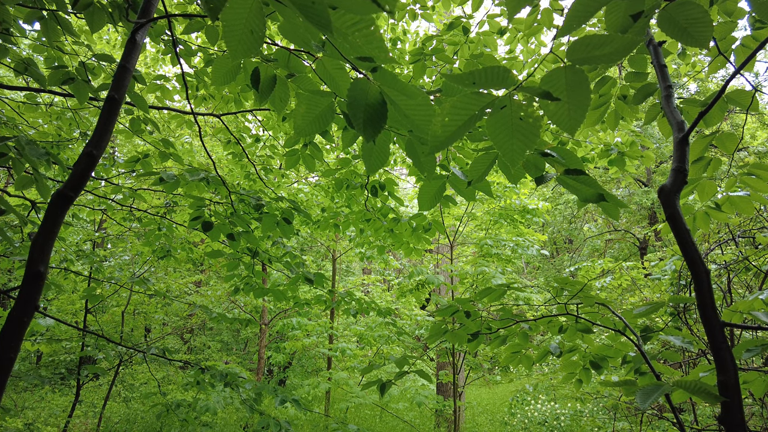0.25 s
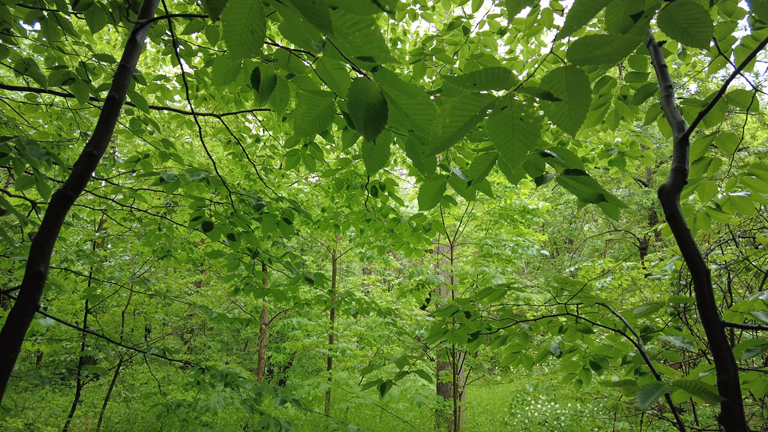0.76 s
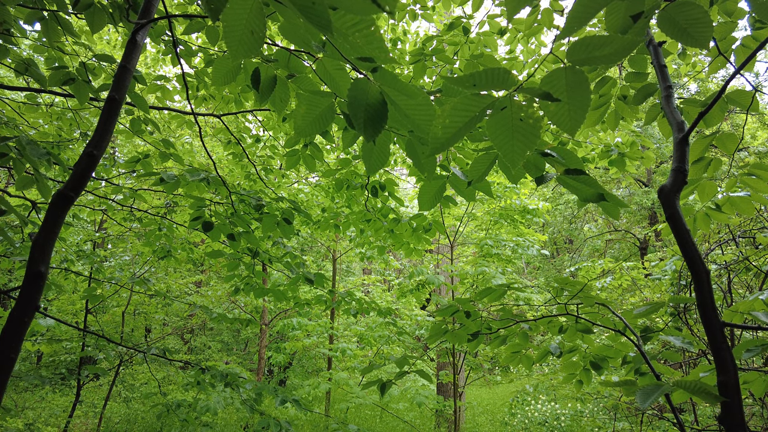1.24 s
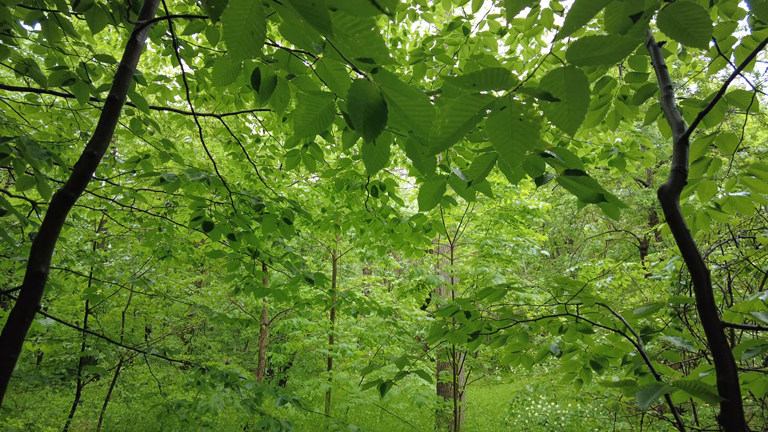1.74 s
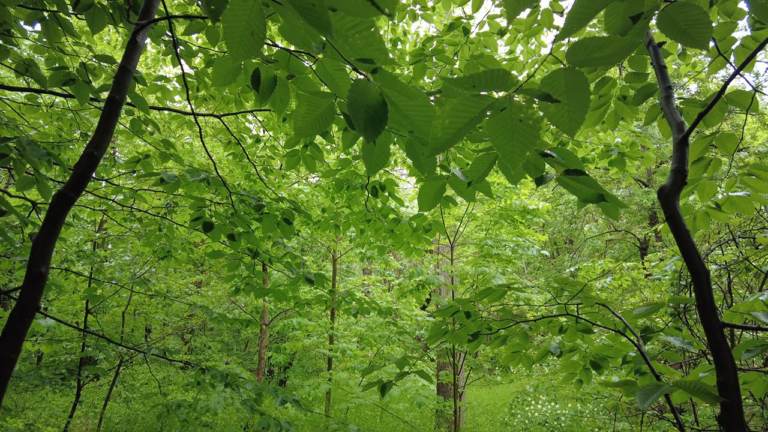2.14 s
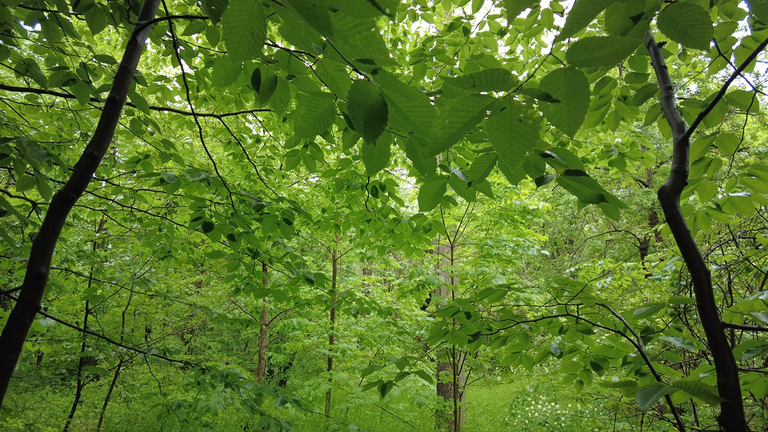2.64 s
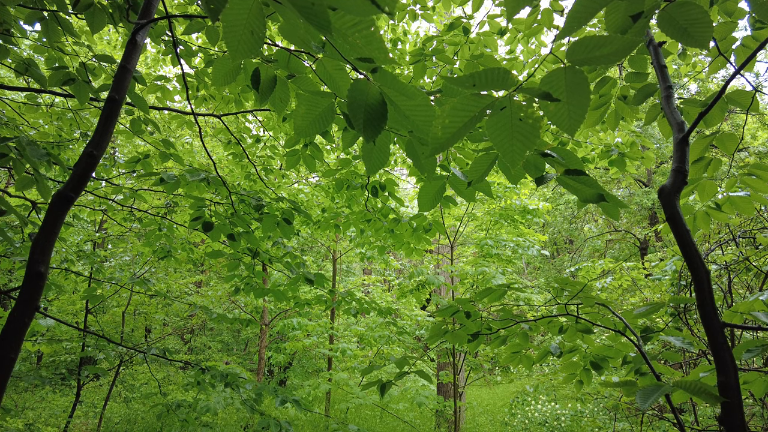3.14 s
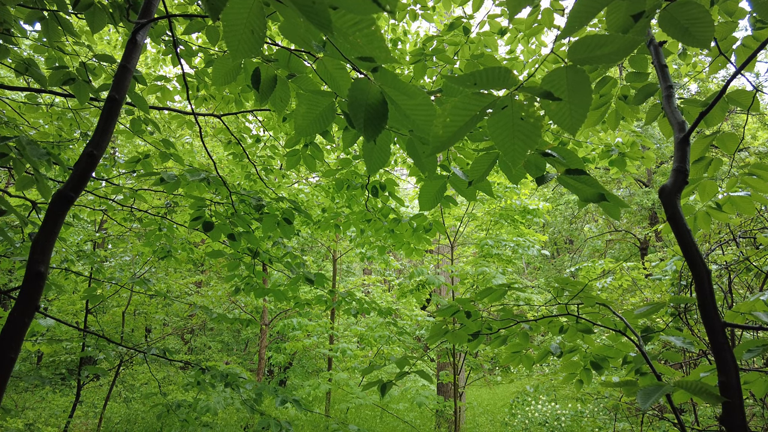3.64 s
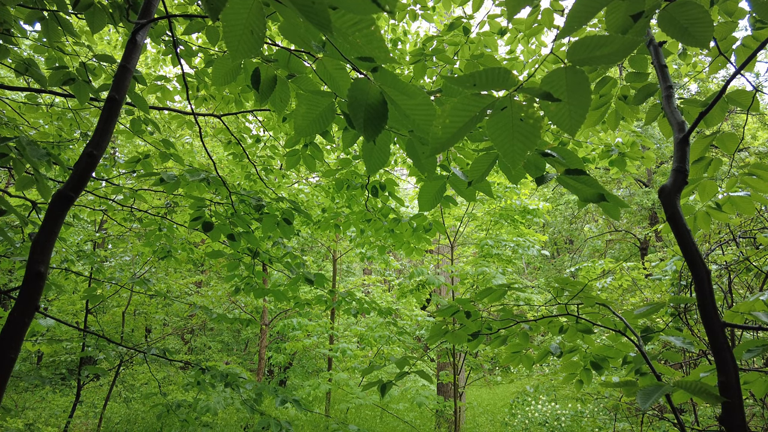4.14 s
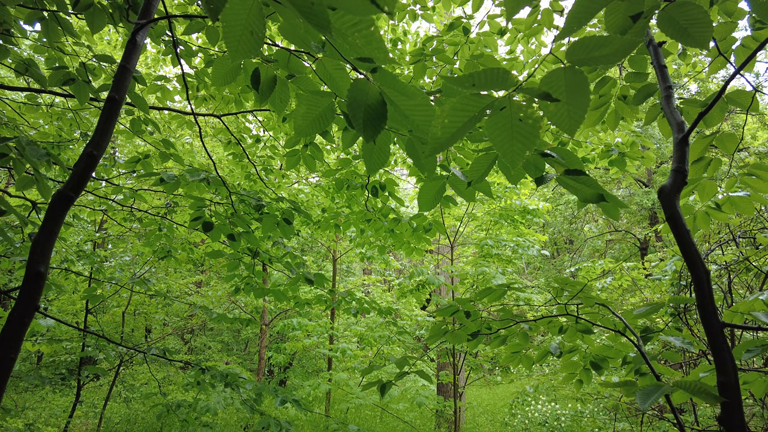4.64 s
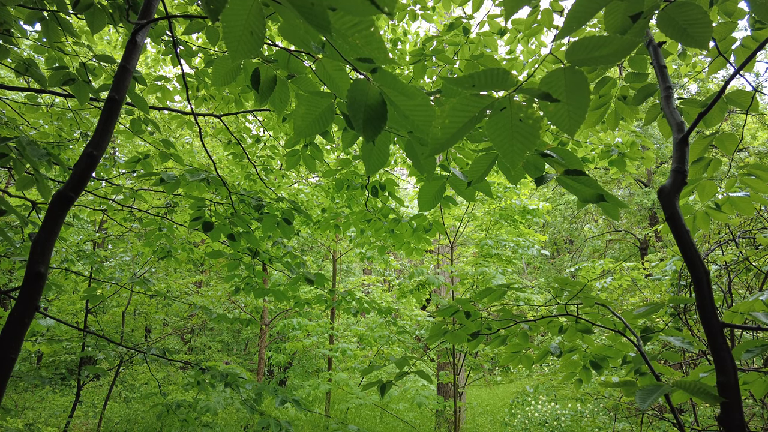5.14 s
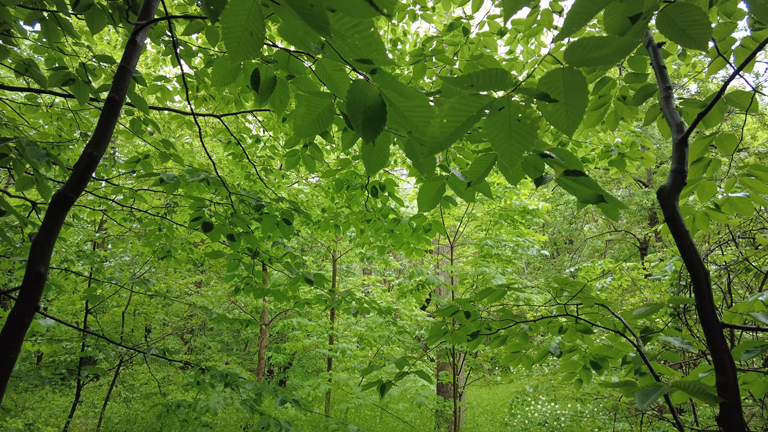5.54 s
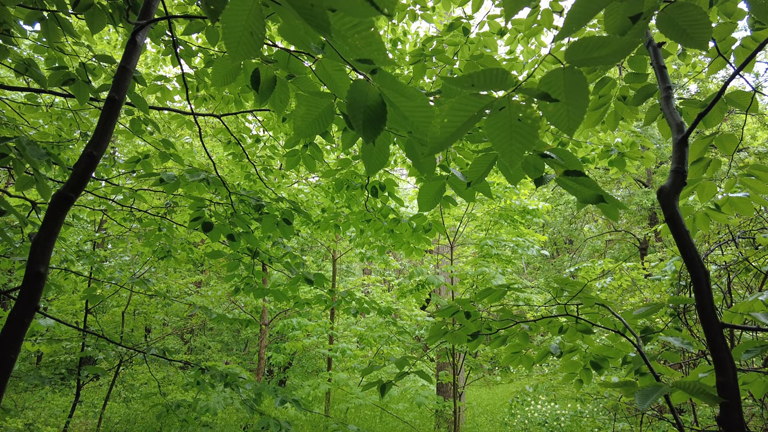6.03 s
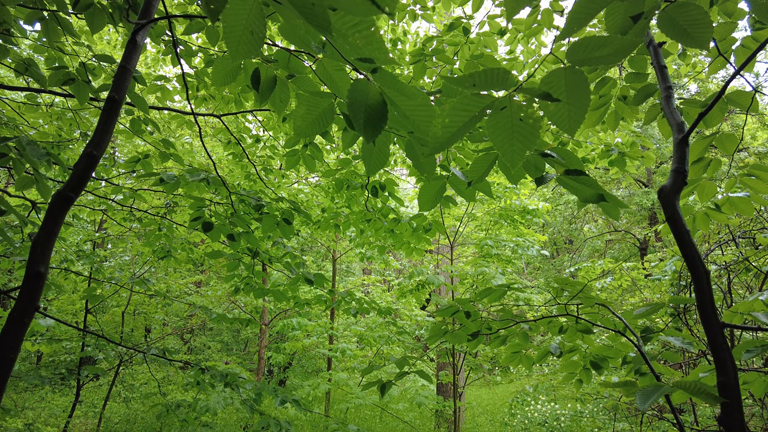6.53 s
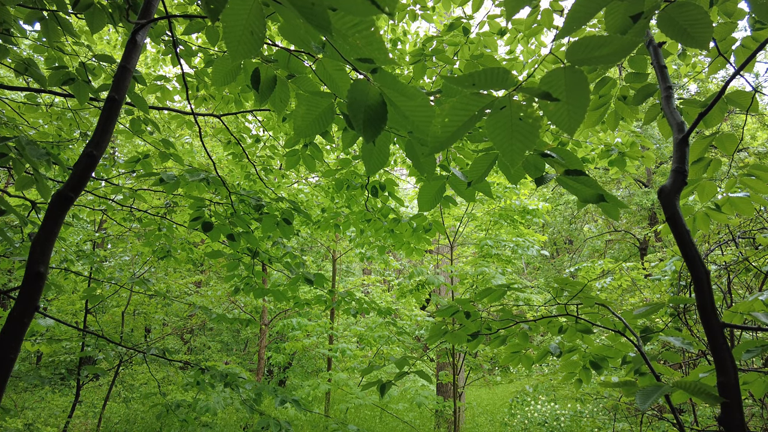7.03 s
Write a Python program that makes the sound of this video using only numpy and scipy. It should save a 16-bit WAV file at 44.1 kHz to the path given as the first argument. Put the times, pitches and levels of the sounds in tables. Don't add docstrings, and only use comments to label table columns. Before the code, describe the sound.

Light rain ticks and pats irregularly on nearby forest leaves over soft hissing patter and a steady low rumble of distant road traffic.

```python
import sys
import numpy as np
from scipy import signal
from scipy.fft import rfft, irfft
from scipy.io import wavfile
from scipy.ndimage import uniform_filter1d

SR = 44100
rng = np.random.default_rng(int(sys.argv[2]) if len(sys.argv) > 2 else 0)


def decibels_to_gain(level_db):
    exponent = np.asarray(level_db, float) / 20
    return 10 ** exponent


def generate_wav(sig):
    pcm = np.round(np.clip(np.atleast_2d(sig).T, -1, 1) * 32767).astype(np.int16)
    wavfile.write(sys.argv[1], SR, pcm)


N = 321048
T = np.arange(N) / SR

# start_s, peak_db, ring_hz, crack_db (re peak), left_minus_right_db
SPLATS = [(0.5072, -42.5, 6300, 2, 5.5), (0.9756, -41.5, 5660, -3, -2.5), (1.1179, -47, 2070, -26, 3.5),
          (1.299, -48.5, 4400, -15, -2.5), (1.67, -38.5, 4300, -10, 5.5), (2.0196, -52, 3700, -8, 0.5),
          (2.667, -45.5, 3223, -25, 6), (2.6712, -44, 5510, -16, 4.5), (3.488, -52, 2800, -17, 3),
          (4.0123, -51.5, 4715, -17, 0.5), (4.145, -46, 4700, -22, -2.5), (5.696, -48.5, 1500, -28, 0),
          (5.8312, -45, 1600, -21, 4)]
# start_s, peak_db, ring_hz, splash_db (re peak), left_minus_right_db
TICKS = [(.3865, -62, 3370, -11, -1), (.6993, -52, 4430, -28, -7), (1.5359, -53, 4600, -8, 7.5),
         (1.5973, -64, 3903, -14, 0), (1.8517, -63, 10000, -6, 0), (1.8896, -58.5, 5950, -3, 4),
         (2.4818, -64, 10930, -6, -4), (2.8544, -53, 4350, -19, -2.5), (2.9183, -66, 1383, -18, 5),
         (3.088, -65, 6300, -23, 0), (3.3052, -56, 5970, -5, 5), (5.071, -49, 6130, -8, 5.5),
         (4.801, -62, 2040, -11, -5), (4.9531, -63, 10840, -20, 3), (5.419, -56, 1156, 0, 7.5),
         (5.5084, -51.5, 3010, -6, -1), (5.5523, -58, 8040, -23, -1.5), (5.6321, -66, 8040, -6, -5),
         (5.9928, -59, 9880, -18, 6), (6.2033, -51.5, 3200, -19, 2), (6.4212, -54, 2306, -9, 4.5),
         (6.788, -57.5, 5076, -1, 5), (5.072, -47, 11500, -22, 5), (6.5234, -54.5, 9000, -8, 1)]
# start_s, peak_db, ring_hz, left_minus_right_db
PATS = [(.0717, -61, 4130, 9), (.1226, -51, 4400, 3.5), (.6509, -53, 2480, 1), (.7721, -56, 2054, -2),
        (1.057, -53, 2990, -3), (1.305, -51, 4300, -1.5), (1.3838, -43.5, 6230, 5), (1.6272, -57, 2990, 1),
        (1.829, -48.5, 1823, 6.5), (2.1585, -46.5, 1366, 4.5), (2.585, -51.5, 2766, 1),
        (2.6319, -53, 5510, -1), (2.7926, -52, 2760, -2), (3.9853, -58, 3457, -4), (4.4473, -55, 2750, .5),
        (4.4842, -60, 1140, 3), (4.8314, -51, 1841, -2), (4.9911, -56, 2900, -1), (5.034, -49, 1630, 4),
        (5.439, -49, 2713, 1.5), (5.6481, -53, 5650, 6), (5.7249, -52, 2990, 5), (6.3744, -61, 3480, 5),
        (6.8583, -44, 1450, -2.5), (6.9905, -56, 4345, 2.5), (1.6892, -49, 1430, -3),
        (1.6935, -54, 2420, -1), (1.795, -56, 3300, 1), (5.585, -54, 1800, 1), (1.736, -58, 1400, 1)]
# start_s, peak_db, ring_hz, left_minus_right_db
PLOPS = [(.9398, -53.5, 3880, -4), (.9547, -54, 3895, 4), (1.3698, -61, 3400, -1),
         (2.3535, -57.5, 4830, 0.5), (2.5471, -50.5, 2994, 9), (3.1732, -61, 2900, 5.5),
         (3.7264, -66, 6030, 2), (4.1101, -53, 2095, -3.5), (4.349, -52, 2983, -4.5),
         (4.561, -60, 7120, -4.5), (5.3313, -51, 1837, -2), (5.9249, -58, 5050, 7), (5.9454, -57, 4100, -1),
         (6.7316, -55, 2060, -1), (.563, -56, 3100, -2), (.748, -59, 2630, 0), (2.559, -60, 4500, 3),
         (2.776, -55, 4100, 1), (1.702, -59, 4400, 4), (3.225, -64, 2600, -2)]
# start_s, peak_db, knock_hz
KNOCKS = [(0.5063, -52.5, 2600), (.9757, -42.5, 2400), (1.3834, -44, 2100), (1.6702, -48, 2000),
          (1.6891, -42, 2000), (1.6882, -37.5, 800), (2.0191, -46.5, 1700), (2.6656, -43.5, 4200),
          (2.6725, -52, 3200), (4.146, -55, 2300), (5.0712, -48.5, 1698), (5.438, -47.5, 2000),
          (5.696, -51, 1500), (6.859, -53, 2100)]
# start_s, peak_db, centre_hz, crack_db (re peak), left_minus_right_db
SLAPS = [(1.1179, -53, 1700, -30, 0), (1.1179, -61, 6200, -20, 0), (1.3694, -52, 2600, -30, -1),
         (1.3842, -45, 3500, -25, 6.5), (1.6885, -51, 3850, -34, 1.5), (1.829, -59, 7000, -4, 4),
         (2.6667, -51, 1600, -30, 1.5), (3.489, -59, 6300, -20, 1), (4.8, -51, 2201, -30, -2),
         (4.8, -56, 9500, -30, -2), (4.9908, -51, 2200, -30, -1), (5.0336, -54, 6200, -8, 1.5),
         (5.0336, -54, 2800, -25, 2), (5.3304, -57, 2900, -25, -1), (5.4085, -59, 4000, -12, 2),
         (5.6222, -59, 2800, -30, 1.5), (5.7075, -52, 1900, -28, 0), (5.757, -57, 1600, -30, 2),
         (5.8315, -53, 6500, -16, 2.5), (6.5234, -61, 4000, -14, 2), (6.858, -51, 2500, -30, -2),
         (6.874, -58, 1595, -30, 1), (1.671, -46, 6800, -8, 4.5)]
# start_s, peak_db, ring_hz, left_minus_right_db
PINGS = [(.1226, -58, 4400, 3), (1.299, -57, 4300, -2.5), (1.307, -57, 4350, -3.5), (1.537, -64, 4400, 7),
         (.509, -54, 6100, 4), (4.4474, -59, 2800, 0), (5.648, -58, 5600, 5.5), (5.696, -53, 2800, -1),
         (6.4225, -64, 4600, 3), (6.7325, -59, 3300, -1), (6.858, -52, 2610, -2.5), (6.99, -59, 4350, 3.5),
         (1.6885, -47, 3200, 0), (1.692, -51, 800, 2), (5.692, -55, 850, 0), (5.295, -53, 900, 2),
         (.5068, -54, 6200, 5), (1.6705, -49, 4700, 4), (1.675, -54, 3600, 3), (1.6705, -53, 1700, 2),
         (2.672, -54, 4400, 5), (2.682, -58, 5400, 3), (2.694, -59, 3600, 4), (4.9908, -58, 2700, -2),
         (5.0336, -57, 1800, 2), (5.438, -56, 3200, 1), (5.44, -55, 1650, 0), (5.5095, -55, 1400, -1),
         (5.331, -60, 2200, -1), (6.859, -57, 3000, -2), (1.697, -56, 3000, 1)]
# start_s, peak_db, ring_hz, left_minus_right_db
THUDS = [(0.106, -53, 794, 2.5), (1.015, -54, 834, -1), (1.807, -52, 818, 3.5), (2.326, -52, 810, 0),
         (4.614, -50, 718, 1.5), (4.8, -52, 910, 4), (5.17, -49, 823, 4), (5.896, -51, 781, 1),
         (6.521, -54, 506, 1.0), (7.035, -55, 851, 4)]

# time_s, gain_db
SHOWER = [(0, 3), (.6, 0.5), (1, 1.5), (2.3, 0), (2.7, 1.5), (3.9, 0), (4.2, 0.5), (4.5, 0), (5.5, 1.5),
          (7.28, 0.5)]
# centre_s, half_length_s, gain_db
FLURRIES = [(.14, 0.046, 1), (.96, .05, 2), (1.73, 0.065, 1.5), (2.68, 0.059, 2.5), (3.18, 0.07, 2),
            (3.32, .05, 1.5), (3.51, .05, 2), (4.2, .07, 3), (4.93, .05, 3.5), (5.44, 0.057, 4.5),
            (5.53, 0.034, 3.5), (5.86, .05, 0.5), (5.96, 0.046, 2), (6.82, 0.041, 3.5)]
# frequency_hz, density_db (per Hz)
HISS_SPECTRUM = [(1060, -25), (1800, -8.5), (2330, 0), (4370, -6.5), (7770, -12.5), (10100, -17),
                 (12200, -18), (12800, -18.5), (13300, -48), (16000, -35)]
# frequency_hz, density_db (per Hz)
MIST_SPECTRUM = [(14200, -14), (15000, -5), (15600, 0), (15900, 0)]

# time_s, gain_db
TRAFFIC = [(0, -0.5), (1.6, 1), (2.7, -1), (4, 0), (5.4, -1), (6.2, 1), (7.28, 0)]
# frequency_hz, density_db (per Hz)
RUMBLE_SPECTRUM = [(8.8, -39.5), (15, -3), (43, 2), (70, -0.5), (98, -3.5), (172, -20), (200, -27.5),
                   (260, -25.5), (440, -120)]
# frequency_hz, density_db (per Hz)
ROAR_SPECTRUM = [(100, -37), (170, -4), (297, 2.5), (475, -10.5), (804, -11.5), (1030, -19.5), (1140, -22),
                 (1290, -16.5), (2200, -30.5), (2860, -69), (4840, -120)]
# frequency_hz, density_db (per Hz)
TREAD_SPECTRUM = [(690, -17), (770, 6), (860, 3), (960, -11.5)]
# frequency_hz, left_minus_right_db
PORT_LEAN = [(60, -1.5), (110, 0.5), (200, 1), (380, 0), (700, 2.5), (1290, 1), (2380, 0.0), (4400, 1),
             (8120, -1), (15000, 1.5)]
# frequency_hz, likeness_0_to_1, right_lag_rad
PORT_COHERENCE = [(60, .99, 0), (170, .98, .1), (260, .89, .2), (430, .78, .2), (600, .46, 1.2),
                  (860, .28, 1.2), (1030, .28, 2.6), (1150, .15, 2.9), (1190, .2, .1), (1330, .75, .1),
                  (1720, .39, .1), (2330, .33, 0), (3300, .1, 0), (3600, .1, 2.5), (4700, .22, 2.7),
                  (15000, .1, 2.4)]

# time_s, pitch_hz, level_db
LORRY = [(0, 90.64, -47.5), (3, 73.87, -54)]
# time_s, pitch_hz, level_db
CAR = [(3.4, 128, -60), (3.65, 125, -55), (4.3, 105, -53.5), (4.9, 90, -50), (5.9, 76, -49)]
# time_s, pitch_hz, level_db
VAN = [(2.6, 54.63, -53), (3.2, 59.76, -45.5), (3.9, 62.7, -53)]
# time_s, pitch_hz, level_db
IDLER = [(0, 32.3, -41.5), (.6, 33.87, -53), (1.3, 37.06, -44.5), (2.5, 36.38, -45), (3, 35.87, -53),
         (5.4, 37, -55), (5.9, 36.9, -43), (6.2, 36.5, -53), (6.6, 37.2, -45), (7.28, 37, -45.5)]
# time_s, pitch_hz, level_db
WHINE = [(6.1, 150.2, -63), (7.28, 150.5, -62)]
# time_s, pitch_hz, level_db
OVERTONES = [
    [(.8, 172.6, -65.5), (1.75, 160.5, -60)],
    [(1.2, 1230, -81), (2.2, 1225, -76)],
    [(4.7, 312, -68.5), (5.7, 309.5, -61), (6.05, 304.4, -64)],
]
# centre_s, half_length_s, gain_db
AIR_SWELLS = [(0.123, 0.073, 13), (0.309, 0.054, 11.5), (0.482, 0.05, 8.5), (.85, 0.2, 11.5),
              (1.154, 0.057, 11), (1.615, 0.067, 4.5), (1.883, 0.11, 12), (2.342, 0.13, 12),
              (2.678, 0.046, 14), (4.334, 0.11, 6), (4.533, 0.065, 3), (5.392, 0.14, 7), (5.65, 0.051, 8)]

# start_s, length_s, start_hz, end_hz, trembles_per_s, level_db
BIRD_NOTES = [
    (2.45, .11, 7150, 7100, 2200, -81),
    (4.54, .19, 7000, 7150, 2600, -81),
    (4.06, .07, 7600, 7500, 900, -83),
    (3.09, .08, 2500, 3300, 400, -79),
    (3.23, .075, 2450, 2300, 40, -74),
    (3.385, .065, 2400, 2950, 40, -75),
    (6.528, .04, 2750, 2720, 40, -72),
]


def resonance(hz, centre_hz, sharpness):
    s = 1j * hz / centre_hz
    return s / sharpness / (1 + s / sharpness + s * s)


def add(out, times, bursts):
    for t, burst in zip(times, bursts):
        i = int(t * SR)
        out[:, i:i + burst.shape[1]] += burst[:, :max(N - i, 0)]


def drops(times, db, ring_hz, crack_db, splash_db, pan_db, ringing=1.0, sharpness=0.88, step=1.98, size=3072):
    t, hz = np.arange(size) / SR, np.fft.rfftfreq(size, 1 / SR)
    chance = rng.standard_normal((len(times), 3, size))
    hit = chance[:, :1] * np.exp(-t / 0.00084) + 0.46 * chance[:, 1:] * np.exp(-t / 0.0079)
    hit[:, :, :2] += step

    ragged = decibels_to_gain(4.5 * np.repeat(chance[:, :1, -size // 32:], 32, axis=2))
    fade = (1 - np.exp(-t / 0.001)) * np.exp(-t / 0.018)
    splash = decibels_to_gain(splash_db)[:, None, None] * chance[:, 1:, ::-1] * ragged * fade

    leaf_hz = ring_hz[:, None, None]
    blade = resonance(hz, 0.83 * leaf_hz, sharpness)
    upper = resonance(hz, leaf_hz * (1.73 + 0.13 * chance[:, :1, :1]), 7.1)
    modes = resonance(hz, leaf_hz, 8.5) + 0.34 * upper
    ring = blade * (0.66 * blade + ringing * modes)
    crack = decibels_to_gain(crack_db - 2.5)[:, None, None] * resonance(hz, 8400, 0.41) ** 2
    spray = resonance(hz, 3250, 0.72) ** 2

    side = np.array([1, -1])[:, None] * pan_db[:, None, None]
    lead_samples = np.clip(side * 1.3, -9, 9) - 10
    ports = decibels_to_gain(side / 2) * np.exp(2j * np.pi * hz * lead_samples / SR)
    struck = irfft(rfft(hit) * (ring + crack) * ports)
    scattered = irfft(rfft(splash) * (0.42 * ring + 0.42 * spray + 0.57 * crack))
    scale = decibels_to_gain(db) / abs(struck).max(axis=(1, 2))
    out = np.zeros((2, N))
    add(out, times, scale[:, None, None] * (struck + scattered))
    return out


def splats(count=4):
    when, db, hz, crack_db, pan_db = np.transpose(SPLATS)[:, :, None]
    k = np.arange(count)
    chance = rng.standard_normal((len(when), 4, count)).transpose(1, 0, 2)
    gap_s = 0.004 * 0.93 ** k * (1 + 0.12 * k * chance[0]).clip(.3)
    late = np.cumsum(gap_s, axis=1)
    fragment_db = db - 9.5 + 0.16 * crack_db - 3 * k - 0.5 * chance[1]
    fragment_hz = hz * (5000 / hz) ** 0.19 * np.exp(0.17 * chance[2])
    fragments = (when + late, fragment_db, fragment_hz, crack_db - 3 + 0 * k, -6.5 + 0 * late, 4 * chance[3])
    heads = (when, db, hz, crack_db, -9 + 0.4 * crack_db, pan_db)
    return drops(*(np.hstack(pair).ravel() for pair in zip(heads, fragments)))


def ticks():
    s, db, hz, splash_db, pan_db = np.transpose(TICKS)
    return drops(s, db, hz, 0 * s - 9, splash_db, pan_db)


def soft_drops(table, crack_db, splash_db):
    s, db, hz, pan_db = np.transpose(table)
    octaves = np.log2(hz / 3000).clip(max=0)
    return drops(s, db, hz, crack_db + 9 * octaves, splash_db + 2 * octaves, pan_db)


def pats():
    return soft_drops(PATS, crack_db=-21, splash_db=-19)


def plops():
    return soft_drops(PLOPS, crack_db=-29, splash_db=-10)


def knocks():
    s, db, hz = np.transpose(KNOCKS)
    return drops(s, db, hz, 0 * s - 40, 0 * s - 20, 0 * s + 0.55, ringing=0, sharpness=0.96, step=5, size=2048)


def wood(near, size=16384):
    t = np.arange(size) / SR
    decay = np.exp(-np.log(1000) * t / 0.35)
    tail = rng.standard_normal((2, size)) * decay * np.clip(t / 0.011, 0, 1)
    tail = irfft(rfft(tail) * resonance(np.fft.rfftfreq(size, 1 / SR), 4500, 0.35))
    tail = tail * decibels_to_gain(-12) / np.sqrt((tail ** 2).sum(axis=1, keepdims=True))
    return near + signal.fftconvolve(near.mean(axis=0)[None], tail, axes=1)[:, :N]


def slaps():
    s, db, hz, crack_db, pan_db = np.transpose(SLAPS)
    return drops(s, db, hz, crack_db, 0 * s - 17, pan_db, ringing=0, sharpness=1.5, step=5, size=2048)


def pings_and_thuds():
    s, db, hz, pan_db = np.transpose(THUDS + PINGS)
    return drops(s, db + 3.5, hz, 0 * s - 60, 0 * s - 30, pan_db, ringing=1.8, sharpness=2.9, size=2048)


def patter(db, spread_db, count=1300):
    when, big, leaf, bright, side = rng.random((count, 5)).T
    size_db = db - spread_db * np.log(1 - .96 * big)
    leaf_hz = 1300 * 5.5 ** leaf
    far = drops(when * N / SR, size_db, leaf_hz, -30 + 16 * bright, 0 * when - 12, 6 * (side - .5), size=1024)
    return signal.sosfilt(signal.butter(10, 12400, fs=SR, output="sos"), far)


def over_hz(table, hz):
    f, db = np.transpose(table)
    return decibels_to_gain(np.interp(np.log(hz + 1), np.log(f), db))


def walk(rate):
    k = int(SR / rate)
    held = np.repeat(rng.standard_normal(N // k + 1), k)
    return 1.72 * uniform_filter1d(uniform_filter1d(held, k), k)[:N]


def humps(rows):
    return sum(db * np.sqrt(np.clip(1 - ((T - s) / half) ** 2, 0, 1)) for s, half, db in rows)


def wash(spectrum, db, flicker_db, flicker_rate):
    hz = np.fft.rfftfreq(N, 1 / SR)
    low_hz, high_hz = spectrum[0][0], spectrum[-1][0]
    colour = over_hz(spectrum, hz) * (hz > low_hz) * (hz < high_hz)
    left, other = rfft(rng.standard_normal((2, N))) * colour

    f, like, lag = np.transpose(PORT_COHERENCE)
    like, lag = (np.interp(np.log(hz + 1), np.log(f), v) for v in (like, lag))
    right = like * np.exp(-1j * lag) * left + np.sqrt(1 - like ** 2) * other
    lean = np.sqrt(over_hz(PORT_LEAN, hz))
    pair = np.array([left * lean, right / lean]) / np.sqrt(1 + like * np.cos(lag))

    place = 2 * np.log2((hz + 1) / low_hz)
    out = np.zeros((2, N))
    for k in range(int(2 * np.log2(high_hz / low_hz)) + 2):
        band = irfft(pair * np.clip(1 - abs(place - k), 0, 1), N)
        out += decibels_to_gain(flicker_db * walk(flicker_rate)) * band
    return out * decibels_to_gain(db) / np.std(out.mean(axis=0))


def far_rain(shower_db):
    hiss_db = -75.5 + shower_db
    hiss = wash(HISS_SPECTRUM, hiss_db - 2, 0.73, 11)
    mist = wash(MIST_SPECTRUM, hiss_db - 22.5, 3.5, 16)
    return hiss + patter(-72, spread_db=3) * decibels_to_gain(shower_db) + mist


def road():
    traffic_db = np.interp(T, *np.transpose(TRAFFIC))
    roar_db = -56 + 0.06 * traffic_db
    rumble = wash(RUMBLE_SPECTRUM, -41.5 + traffic_db, 0.65, 2.7)
    roar = wash(ROAR_SPECTRUM, roar_db + 1.42, 0.99, 4.6)
    tread = wash(TREAD_SPECTRUM, roar_db - 13.5, 3.5, 7)
    return rumble + roar + tread


def engine(table, carried_db=0):
    s, hz, db = np.transpose(table)
    since_start = T - s[0] + (s[0] < .01)
    until_end = s[-1] - T + (s[-1] > T[-1] - .01)
    edge = np.clip(np.minimum(since_start, until_end) / 0.089, 0, 1)
    phase = 2 * np.pi * np.cumsum(np.interp(T, s, hz)) / SR + 0.6 * walk(5)
    return np.sqrt(2) * edge * decibels_to_gain(np.interp(T, s, db) + carried_db) * np.sin(phase)


def engines():
    carried_db = humps(AIR_SWELLS)
    notes = engine(LORRY, carried_db) + engine(CAR, carried_db) + engine(VAN)
    notes += engine(IDLER) + engine(WHINE)
    return notes * decibels_to_gain(np.array([[-.8], [.8]])) + sum(map(engine, OVERTONES))


def birds():
    out = np.zeros(N)
    for start, length, from_hz, to_hz, tremble, db in BIRD_NOTES:
        part = np.clip((T - start) / length, 0, 1)
        phase = 2 * np.pi * np.cumsum(from_hz + (to_hz - from_hz) * part) / SR
        swell = np.sqrt(abs(np.sin(np.pi * part)))
        steady = 30 / tremble
        trembling = 0.15 + steady + (1 - steady) * walk(tremble)
        out += decibels_to_gain(db) * swell * trembling * np.sin(phase)
    return out * np.array([[1.2], [.7]])


def scene():
    shower_db = np.interp(T, *np.transpose(SHOWER)) + humps(FLURRIES)
    near = wood(splats() + ticks() + pats() + plops() + knocks())
    near += slaps() + pings_and_thuds()
    return near + far_rain(shower_db) + road() + engines() + birds()


def top_cut(x):
    return signal.sosfilt(signal.butter(12, 16440, fs=SR, output="sos"), x)


def record(dry):
    top = signal.ellip(6, .2, 40, 15700, fs=SR, output="sos")
    nearest_end_s = np.minimum(T[-1] - T, 2 * T + .0024)
    fade = np.sin(np.pi / 2 * np.clip(nearest_end_s / .005, 0, 1)) ** 2
    return top_cut(signal.sosfiltfilt(top, dry) * fade)


dry = scene()
out = record(dry)
generate_wav(out)
```